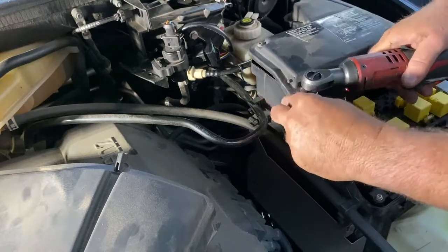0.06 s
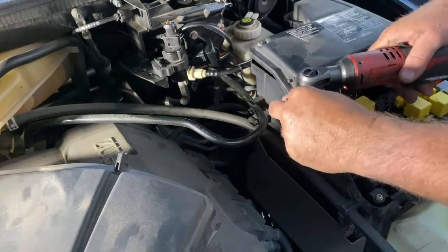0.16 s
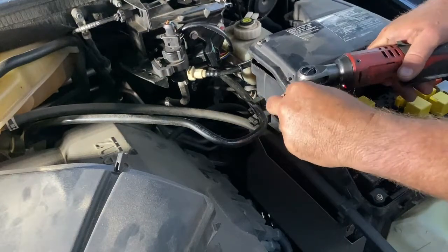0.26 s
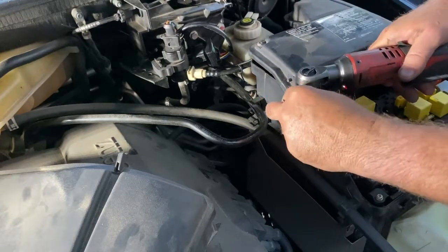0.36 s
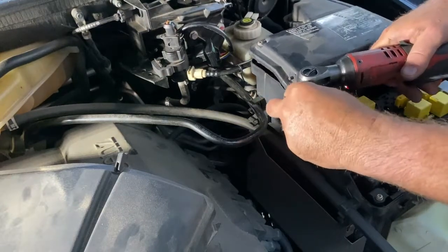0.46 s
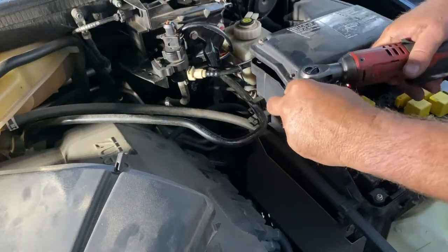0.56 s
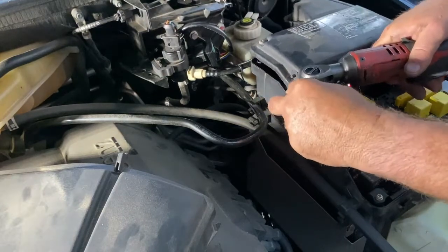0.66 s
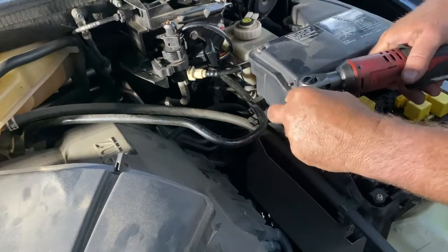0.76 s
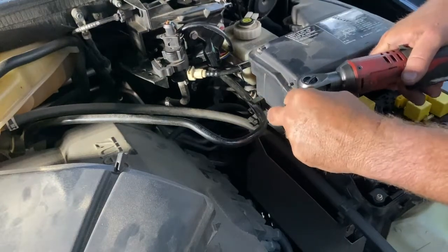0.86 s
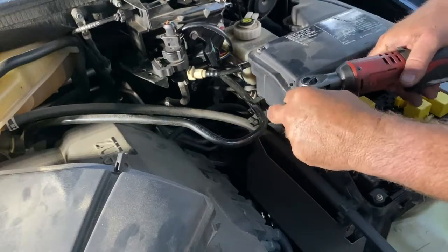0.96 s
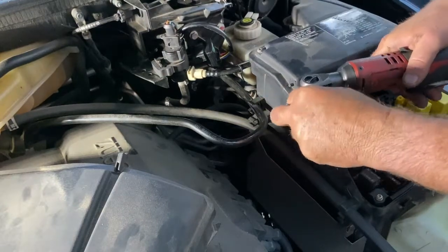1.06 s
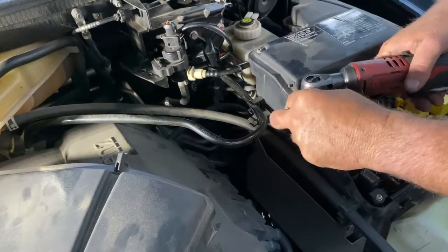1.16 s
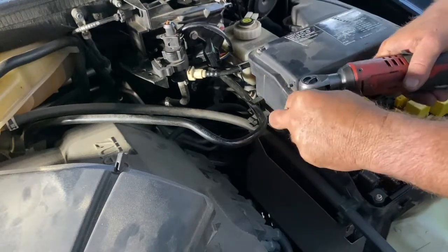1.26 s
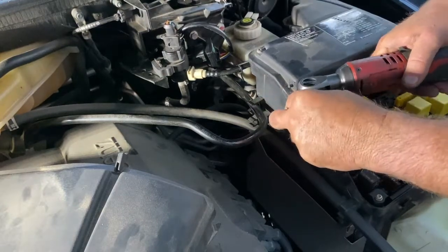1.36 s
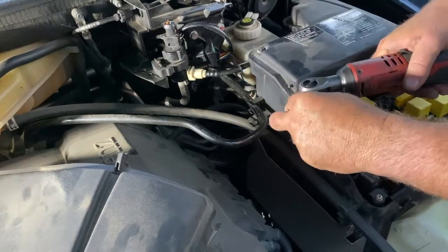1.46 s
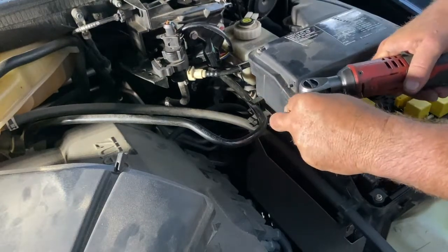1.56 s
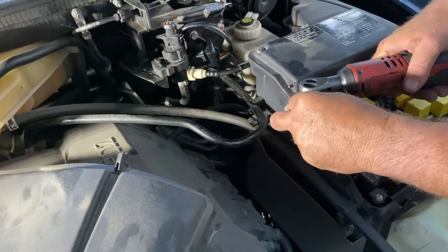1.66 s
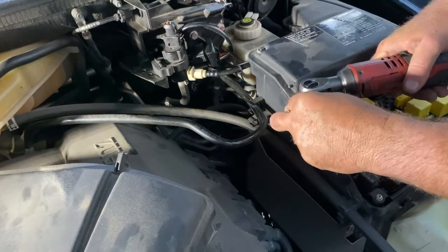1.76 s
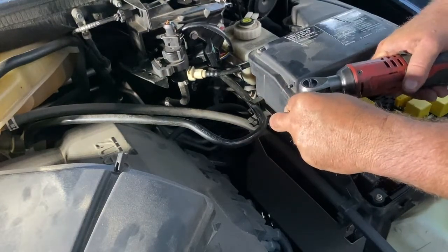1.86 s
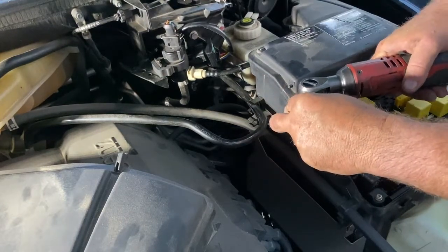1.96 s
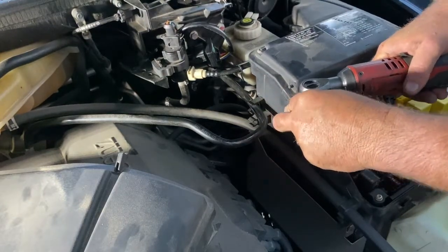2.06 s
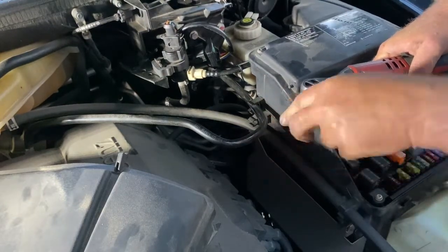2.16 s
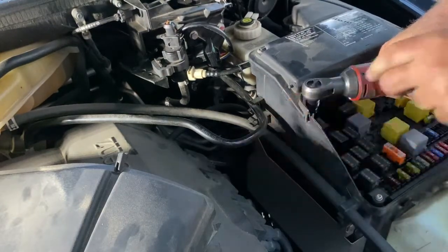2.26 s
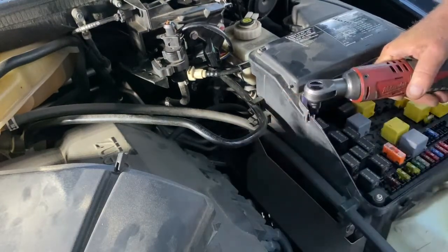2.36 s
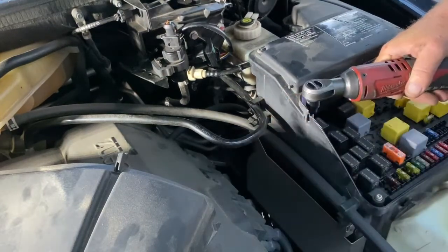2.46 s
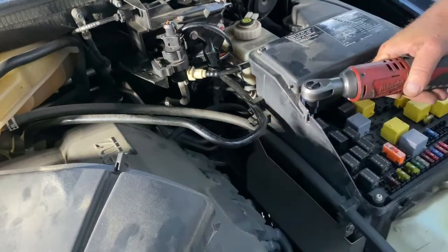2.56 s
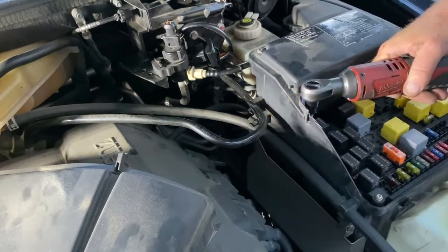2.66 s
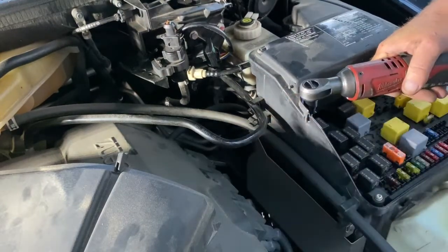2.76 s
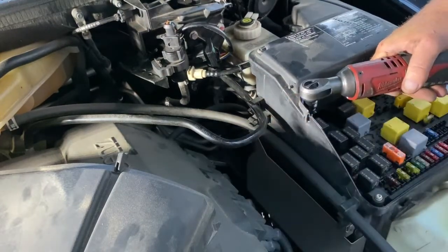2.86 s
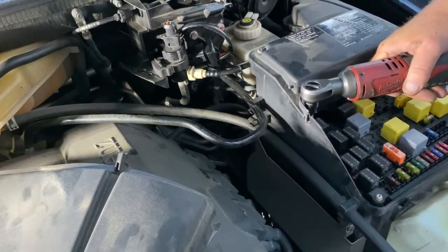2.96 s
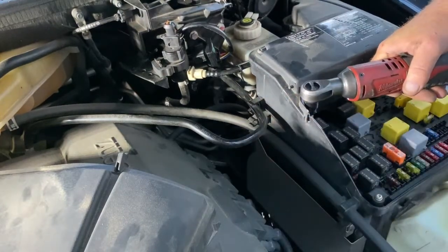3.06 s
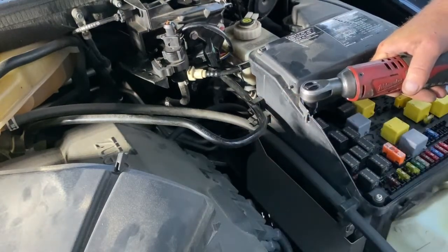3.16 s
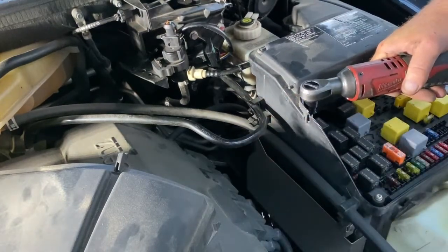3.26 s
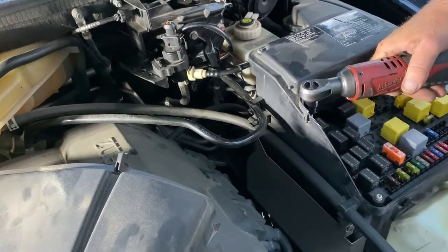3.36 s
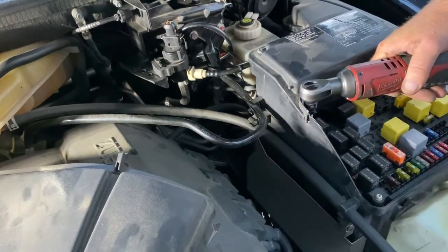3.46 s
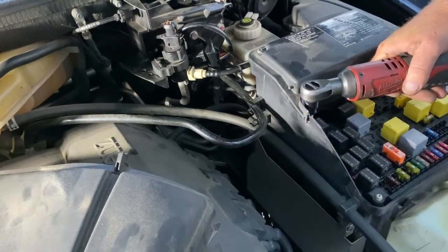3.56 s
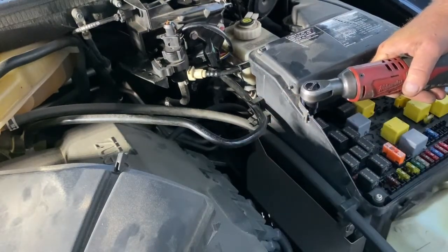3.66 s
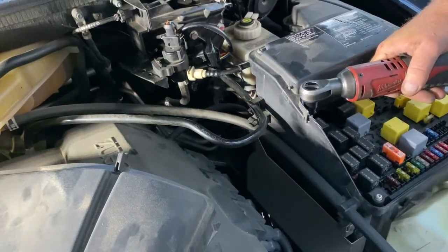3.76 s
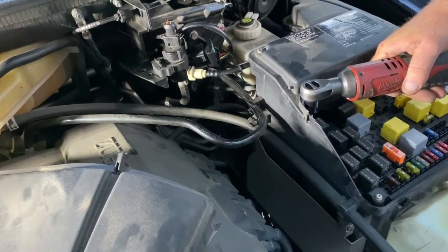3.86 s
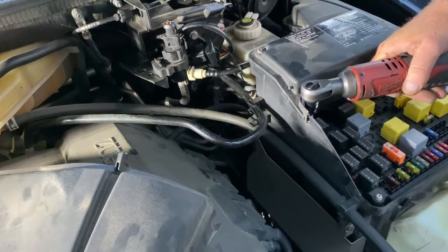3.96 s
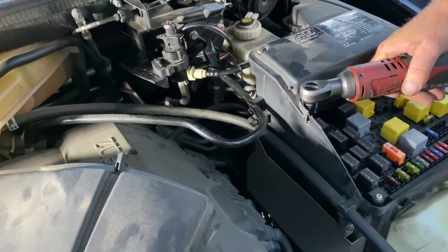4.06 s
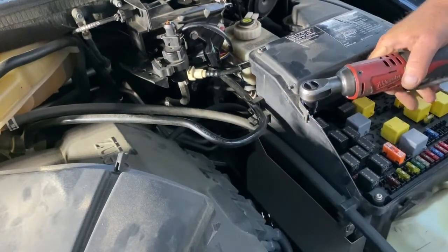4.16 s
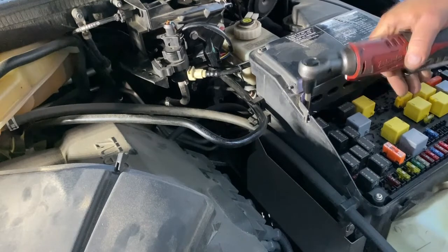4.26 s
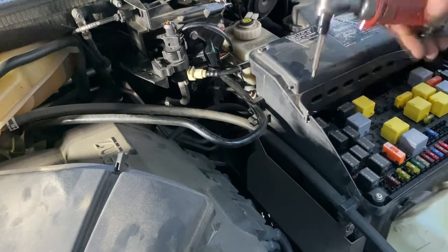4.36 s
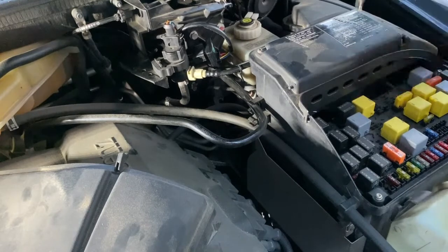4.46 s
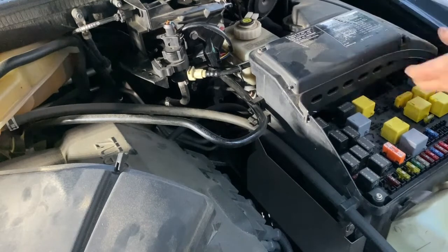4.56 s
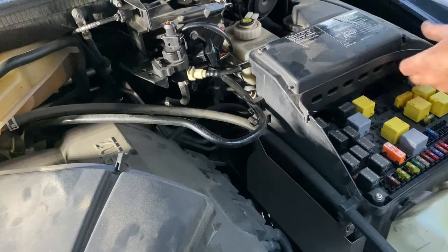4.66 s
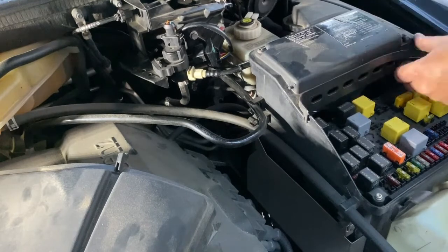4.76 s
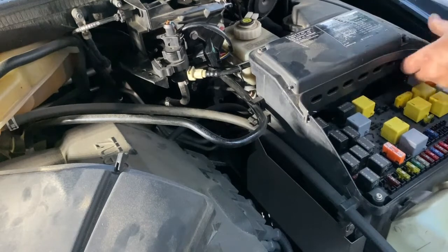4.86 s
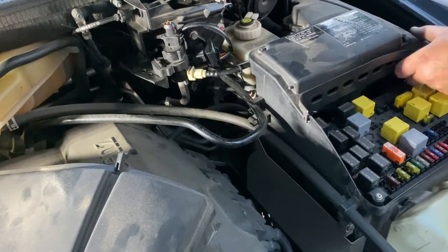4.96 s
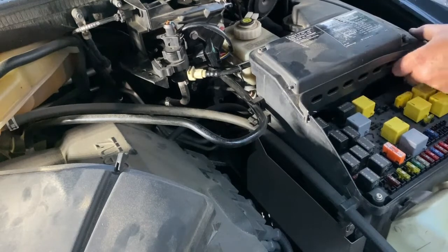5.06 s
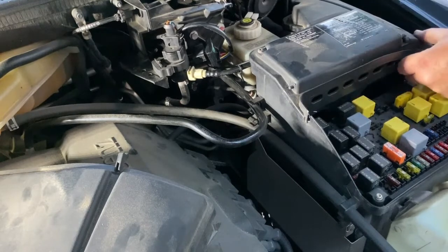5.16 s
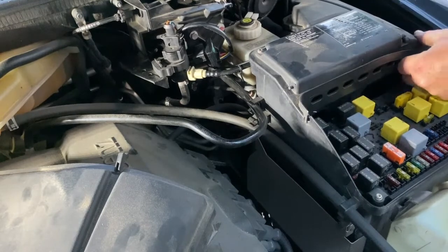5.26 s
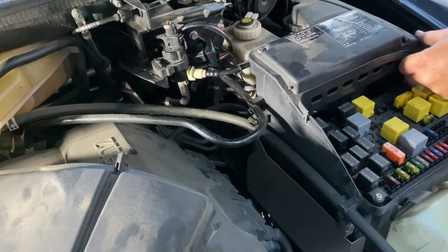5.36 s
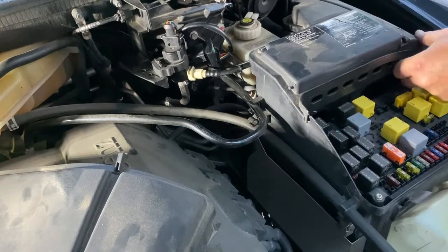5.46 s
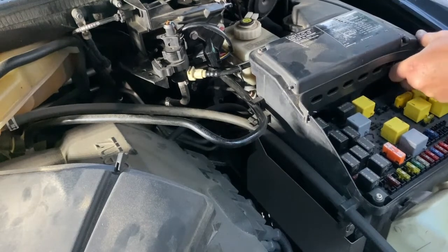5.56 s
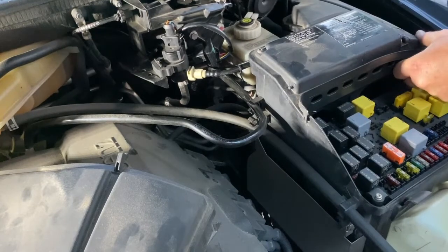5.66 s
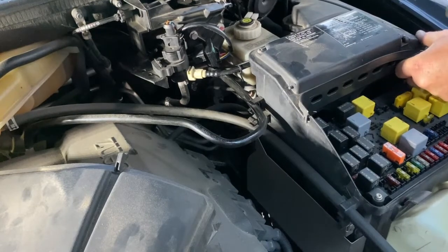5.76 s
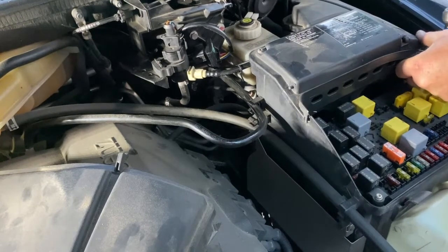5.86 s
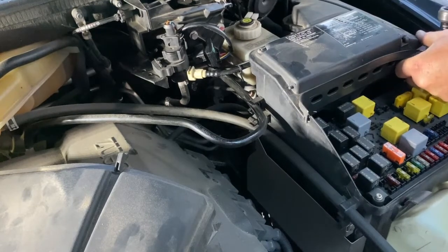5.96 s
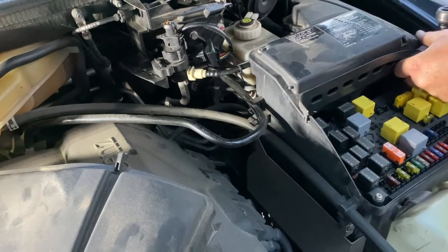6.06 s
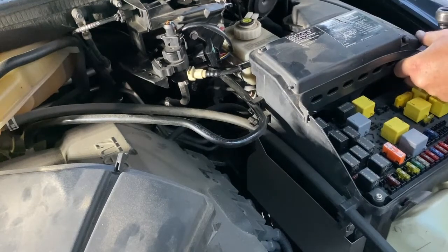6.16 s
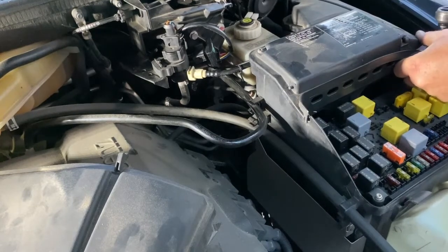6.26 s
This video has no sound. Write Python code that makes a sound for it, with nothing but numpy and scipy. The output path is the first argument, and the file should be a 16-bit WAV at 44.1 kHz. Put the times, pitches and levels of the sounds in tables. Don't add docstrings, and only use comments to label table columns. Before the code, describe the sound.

Hands bump a hollow plastic cover outdoors, then a cordless ratchet rattles harshly for three seconds, clicks down to rest, and the cover snaps home.

```python
import sys
import numpy as np
from scipy import signal
from scipy.fft import rfft, irfft, next_fast_len
from scipy.io import wavfile
from scipy.ndimage import uniform_filter1d

SR = 44100
rng = np.random.default_rng(int(sys.argv[2]) if len(sys.argv) > 2 else 0)


def magnitude_from_level(level_db):
    exponent = np.asarray(level_db, float) / 20
    return 10 ** exponent


def store_wav(level_fs):
    pcm = np.round(np.clip(np.atleast_2d(level_fs), -1, 1) * 32767)
    wavfile.write(sys.argv[1], SR, pcm.T.astype(np.int16))


N = 277389
T = np.arange(N) / SR
HZ = np.fft.rfftfreq(N, 1 / SR)


def evened(x):
    return x / np.sqrt(np.mean(x ** 2) + 1e-20)


def read(points, hz):
    f, value = np.transpose(points)
    return np.interp(np.log(hz + 1), np.log(f + 1), value)


def curve(rows, column, outside):
    rows = np.array(rows)
    return np.interp(T, rows[:, 0], rows[:, column], outside, outside)


def add(mix, s, sound):
    part = mix[round(s * SR):][:len(sound)]
    part += sound[:len(part)]


def coloured(x, points):
    n = x.shape[-1]
    return irfft(rfft(x) * magnitude_from_level(read(points, np.fft.rfftfreq(n, 1 / SR))), n)


def resonate(x, hz, width):
    turn = np.exp(2j * np.pi * np.cumsum(hz * np.ones(x.shape[-1])) / SR)
    r = np.exp(-np.pi * width / SR)
    return 2 * (turn * signal.lfilter([1 - r], [1, -r], x / turn)).imag


def ring(x, modes, drift_db=0):
    out = 0
    for k, (hz, width, db) in enumerate(modes):
        if drift_db:
            db = db + drift_db * wander(8.2)
        out = out + (-1) ** k * magnitude_from_level(db) * resonate(x, hz, width) / np.sqrt(width)
    return out


def wander(hz):
    return evened(irfft(rfft(rng.standard_normal(N)) / (1 + (HZ / hz) ** 2), N))


def levelled(x, db, span=0.24):
    return magnitude_from_level(db) * x / np.sqrt(abs(uniform_filter1d((x ** 2).mean(0), int(span * SR))) + 1e-12)


def chatter(per_s, spread_db, share):
    size = magnitude_from_level(spread_db * np.minimum(rng.exponential(1, (2, N)), 3)) * rng.choice([-1, 1], (2, N))
    sparse = evened(size * (rng.random((2, N)) < per_s / SR))
    return share * sparse + (1 - share) * rng.standard_normal((2, N))


PULL_S, LET_GO_S = 1.362, 4.246
RISE_DB_PER_S, FALL_DB_PER_S = 1405, 1099.5
WAKE_S, SETTLE_DB_PER_S, SETTLE_S = .018, 220, .05
LINGER = 45


def running(lead_s=0):
    rise = RISE_DB_PER_S * (T + min(lead_s, WAKE_S) - PULL_S - .02)
    fall = FALL_DB_PER_S * (LET_GO_S - T) / (1 + LINGER * lead_s)
    settle = SETTLE_DB_PER_S * lead_s * np.exp(-np.maximum(T - PULL_S, 0) / SETTLE_S)
    return (np.minimum(np.minimum(rise, fall), 0) - settle).clip(-120)


# frequency in Hz, level in dB per Hz.
WIND = [(15, -44), (25, -7), (54, 1), (76, -10), (134, -21.5), (151, -26.5), (182, -29.5), (400, -52),
        (520, -80.5), (880, -120)]
# frequency in Hz, level in dB per Hz.
AIR = [(59, -21.5), (100, -9), (365, -21.5), (461, -27), (752, -21), (1310, -25.5), (1610, -23),
       (2170, -25.5), (3860, -41), (5300, -41), (6560, -37), (8830, -64), (11600, -55), (16000, -77)]
# frequency in Hz, left-right likeness.
AIR_SAME = [(40, 0.88), (250, 0.22), (700, 0.13), (3000, 0.23), (15000, 0.28)]
# time in seconds, level in dB.
TRAFFIC = [(0, -48.5), (.3, -53), (.68, -51), (1.0, -50), (1.35, -50.5), (4.4, -54), (4.8, -60),
           (5.5, -64.5), (6.29, -71.5)]
WIND_DB, HISS_DB, HISS_SHARE, HUM_SHARE = -53, -15, 0.93, 1.05
BAY_HUM_DB, BAY_HISS_DB = 6.5, 23.5
GUST_S, GUST_DB, GUST_RISE_S = 5.82, 5, 0.16


def air():
    a, b = rfft(rng.standard_normal((2, N)))
    same = np.clip(read(AIR_SAME, HZ), 0, 1)
    z = np.array([a, same * a + np.sqrt(1 - same ** 2) * b])
    low = 1 / (1 + (HZ / 500) ** 4)
    far_db = curve(TRAFFIC, 1, None) + 50
    wash = uniform_filter1d(magnitude_from_level(running()), int(.08 * SR))
    gust_db = GUST_DB * np.clip(1 - abs(T - GUST_S) / GUST_RISE_S, 0, 1)
    rumble_db = WIND_DB + gust_db + 1.5 * wander(6.2)
    hum_db = -50.0 + HUM_SHARE * far_db + BAY_HUM_DB * wash + 2.9 * wander(5.4)
    hiss_db = -39 + HISS_DB + HISS_SHARE * far_db + BAY_HISS_DB * wash + 0.41 * wander(4)
    traffic = z * magnitude_from_level(read(AIR, HZ))
    rumble = evened(irfft(z * magnitude_from_level(read(WIND, HZ)), N)) * magnitude_from_level(rumble_db)
    hum = evened(irfft(traffic * low, N)) * magnitude_from_level(hum_db)
    hiss = evened(irfft(traffic * (1 - low), N)) * magnitude_from_level(hiss_db)
    return (rumble + hum + hiss) * magnitude_from_level([[.8], [-.8]])


# start in seconds, length in seconds, pitch in Hz, tone level in dB, buzz level in dB.
INSECTS = [
    (-.4, 0.88, 6890, -63.5, -71),
    (.45, 0.74, 6660, -63, -71),
    (1.047, 0.55, 7350, -70, -64.5),
    (4.822, 0.47, 5430, -76, -82),
    (5.355, .11, 5050, -80, -90),
    (5.777, 0.39, 7240, -78, -73.5),
]
SAG_PER_S, SONG_EDGE_DB = 0.027, -12.5
STEADY_SONG = .9


def insects():
    out = np.zeros(N)
    for start, length, top_hz, tone_db, buzz_db in INSECTS:
        along = np.clip((T - start) / length, 0, 1)
        hz = top_hz * (1 - SAG_PER_S * along * length)
        singing = uniform_filter1d(((along > 0) & (along < 1)) * 1., 1500)
        gate = singing * magnitude_from_level(SONG_EDGE_DB * (2 * along - 1) ** 2)
        wavering = evened(resonate(resonate(rng.standard_normal(N), hz, 49), hz, 90))
        steady = np.sin(2 * np.pi * np.cumsum(hz + 25 * wander(40)) / SR)
        tone = wavering + STEADY_SONG * steady
        buzz = evened(resonate(resonate(rng.standard_normal(N), .88 * hz, 1500), .88 * hz, 1500))
        out += gate * (magnitude_from_level(tone_db) * tone + magnitude_from_level(buzz_db) * buzz)
    return out


# frequency in Hz, width in Hz, level in dB.
THUD = [(126, 17, -8), (333, 69, -16), (410, 310, -12.5)]
# frequency in Hz, level in dB per Hz.
SCRAPE = [(900, -22.5), (1500, 3.5), (2800, -5), (5000, -9), (7500, -8.5), (9200, -21), (10500, -15.5),
          (14300, -28), (16000, -42.5)]
TOUCH_S = 0.0042
HEAVY_DB, HEAVY_BASS = -16.5, 0.62
HEAVY_DAMP_HZ = 3


def contacts(rows, scrape_db, walls):
    out, t = np.zeros(N), np.arange(7000) / SR
    touch = t / TOUCH_S * np.exp(1 - t / TOUCH_S)
    for s, thud_db, knock_db, hz in rows:
        push, grit = touch * rng.standard_normal((2, len(t)))
        blow = (t == 0) + 0.064 * push
        heavy_db = max(thud_db - HEAVY_DB, 0)
        thud = ring(blow, [(hz, 35 + HEAVY_DAMP_HZ * heavy_db, 0)] + list(THUD))
        thud = thud - (magnitude_from_level(HEAVY_BASS * heavy_db) - 1) * ring(blow, THUD[:1])
        knock = ring(push, walls)
        scrape = coloured(grit, SCRAPE) * (touch > .01)
        parts = [(thud_db, thud), (knock_db + 7.0, knock), (knock_db + scrape_db + 12.5, scrape)]
        add(out, s - .002, sum(magnitude_from_level(db) * part / abs(part).max() for db, part in parts))
    return out


# time in seconds, thud level in dB, knock level in dB, thud pitch in Hz.
BUMPS = [(0.018, -23.5, -36, 250), (0.058, -29, -37.5, 224), (0.084, -22, -38, 256), (0.093, -19, -40, 222),
         (0.232, -40, -46, 230), (0.262, -30, -54, 201), (0.443, -25, -42.5, 227), (0.527, -27, -38, 251),
         (0.602, -41, -58, 265), (0.794, -31, -44, 245), (0.807, -26, -38, 185), (0.844, -36.5, -63, 204),
         (0.921, -37, -66, 250), (0.962, -33, -45, 265), (0.974, -25.5, -54, 208), (0.999, -36, -67, 207),
         (1.105, -32.5, -63, 240), (1.153, -36, -57, 246), (1.346, -48, -40, 247), (2.469, -18, -27.5, 333),
         (4.823, -53, -53.5, 233), (5.052, -31, -35, 330), (5.059, -12, -41, 283), (5.153, -40, -62, 211),
         (5.201, -45, -46.5, 326), (5.213, -37, -43, 287), (5.235, -39, -52, 254), (5.29, -53, -59, 171),
         (5.503, -51, -57, 253), (5.738, -52, -65, 285)]
# time in seconds, thud level in dB, knock level in dB, thud in Hz.
SLIPS = [
    (0.251, -41, -44, 200),
    (0.43, -27.5, -43, 218),
    (0.762, -33, -38, 225),
    (0.774, -26.5, -37, 249),
    (1.438, -21, -31, 266),
]
# time in seconds, thud level in dB, knock level in dB, thud in Hz.
CLUNKS = [
    (2.474, -22, -36, 396),
    (4.338, -41.5, -33, 234),
    (4.346, -45, -30.5, 235),
    (4.355, -36.5, -35, 234),
    (4.362, -41, -39.5, 172),
]
# frequency in Hz, width in Hz, level in dB.
KNOCK = [(603, 180, -2.5), (756, 140, 7), (1030, 90, 0), (1208, 250, -2.5), (1800, 500, -5),
         (2380, 450, -8)]
# frequency in Hz, width in Hz, level in dB.
SOCKET = [(724, 90, 1.5), (1185, 60, -2), (1680, 80, -11.5), (1884, 120, -8), (2150, 90, -8)]
SKIN_SCRAPE_DB, STEEL_SCRAPE_DB, CLUNK_SCRAPE_DB = -20.5, -8, -16.5


def touches():
    skin = contacts(BUMPS, SKIN_SCRAPE_DB, KNOCK)
    steel = contacts(SLIPS, STEEL_SCRAPE_DB, KNOCK)
    return skin + steel + contacts(CLUNKS, CLUNK_SCRAPE_DB, SOCKET)


# time in seconds, peak level in dB, pitch in Hz.
TICKS = [(0.2488, -56, 6780), (0.4294, -44, 5250), (0.4414, -47, 5090), (0.4534, -48, 6300),
         (0.5287, -39, 5140), (0.763, -32, 7470), (0.7736, -29.5, 5100), (0.8104, -48, 6700),
         (0.9582, -53, 6480), (5.0524, -40, 4660), (5.2759, -58, 4180), (5.5044, -58, 7290)]
# frequency in Hz, level in dB per Hz.
SKIN = [(1500, -24), (3000, -1), (7000, -1.5), (9000, -9.5), (11000, -3), (14500, -7), (16000, -30.5)]
TICK_S, TICK_WIDTH_HZ, TICK_DB, TICK_WIDE_DB = 0.0034, 1500, -1, -5


def ticks():
    out, t = np.zeros(N), np.arange(1200) / SR
    for s, db, hz in TICKS:
        grit = rng.standard_normal(len(t)) * t / TICK_S * np.exp(1 - t / TICK_S)
        tick = evened(resonate(grit, hz, TICK_WIDTH_HZ)) + magnitude_from_level(TICK_WIDE_DB) * evened(coloured(grit, SKIN))
        add(out, max(s - .001, 0), magnitude_from_level(db + TICK_DB) * tick / abs(tick).max())
    return out


def strikes(turns, table, uneven_db, base):
    chance = np.clip(rng.standard_normal((int(turns[-1]) + 3, len(table))), -2, 2)
    out = base
    for k, (angle, db, decay) in enumerate(table):
        since = turns - angle + 1
        out = out + magnitude_from_level(db + uneven_db * chance[since.astype(int), k]) * np.exp(-(since % 1) / decay)
    return uniform_filter1d(out, int(.0018 * SR))


def blows(turns, angle, uneven_db):
    out = np.zeros((2, N))
    at = np.flatnonzero(np.diff(np.floor(turns - angle)))
    out[:, at] = magnitude_from_level(uneven_db * np.clip(rng.standard_normal((len(at), 2)), -2, 2)).T
    return out


def patchy(x, depth_db, broad_db=1.0):
    z = signal.stft(x, nperseg=256)[2]
    patches = uniform_filter1d(rng.standard_normal(z.shape[1:]), size=5, axis=0)
    patches = uniform_filter1d(patches, size=5, axis=1)
    broad = uniform_filter1d(uniform_filter1d(patches, size=25, axis=1), size=25, axis=1)
    gain_db = depth_db * evened(patches) + broad_db * evened(broad)
    return signal.istft(z * magnitude_from_level(gain_db), nperseg=256)[1][:, :N]


# time in seconds, speed in turns per second.
SPEED = [(1.34, 42.3), (1.39, 47.1), (1.46, 64.9), (1.5, 69), (1.58, 71.3), (4.11, 70.4), (4.15, 69.5),
         (4.19, 65.3), (4.22, 57), (4.3, 48)]
# time in seconds, pressure in dB, seating of the cover (0 loose, .5 resting, 1 tight).
GRIP = [(1.36, 2.5, 0.3), (1.55, 1, 0.034), (1.8, 1, 0), (2.03, -1.5, 0.063), (2.2, 1.17, 0.44),
        (2.6, 1.23, 0.58), (2.95, -0.54, 0.6), (3.2, 0.5, 0.87), (3.45, 1.4, 0.8), (3.62, -1, 0.81),
        (3.85, 2.5, 1.05), (4.26, -1.3, 0.81)]
FULL_SPEED = 71


def answer(part):
    db, rest_db, tight_db, still_db, share, lead_s = part
    slow = np.maximum(1 - curve(SPEED, 1, 45) / FULL_SPEED, 0)
    seat = 2 * curve(GRIP, 2, None)
    seated_db = rest_db * np.clip(seat, 0, 1) + tight_db * np.maximum(seat - 1, 0)
    return running(lead_s) + db + seated_db + still_db * slow + share * curve(GRIP, 1, None)


# time in seconds, shaft rate in Hz.
MOTOR = [(1.38, 233.6), (1.46, 286.8), (1.53, 306.4), (1.75, 311.5), (2.45, 315.8), (3.52, 306.7),
         (4.11, 302), (4.26, 237)]
# frequency in Hz, width in Hz, level in dB.
HOUSING = [(284.2, 12.7, 1), (365, 90, -11.5), (412.4, 51, -8.5), (530, 81, -17)]
# frequency in Hz, width in Hz, level in dB.
COVER = [(638.7, 44, -4), (716, 44, 0), (796.5, 19, -1), (926, 22, -3), (1072, 45, -11)]
# frequency in Hz, width in Hz, level in dB.
LOOSE_COVER = [(790, 70, 3), (940, 70, 3), (1065, 60, -4)]
# frequency in Hz, width in Hz, level in dB.
STEEL = [(1129, 46, -2.5), (1395, 73, 6.5), (1816, 160, 0), (2138, 50, 2), (2660, 48, 4.5),
         (3010, 100, 2.5), (3690, 250, 3), (4330, 120, -2), (4990, 140, -0.5), (6830, 760, 5)]
# frequency in Hz, level in dB per Hz.
RATTLE = [(240, -41.5), (400, -10.5), (494, -12.5), (550, -18), (707, -9.5), (922, -7), (1110, -7.5),
          (1200, -13), (1390, -10.5), (1630, -11), (3080, -10.5), (5900, -14), (6730, -13.5), (9500, -14.5),
          (12400, -45), (20900, -120)]
# frequency in Hz, level in dB per Hz.
PAWL = [(7500, -21.5), (8600, -11), (9300, -8), (10700, -4), (12200, -0.5), (13400, 7), (14800, -12),
        (15700, 1), (16100, -33.5), (17000, -50.5)]
# part of a turn, strength in dB, die-away as part of a turn.
GEAR_STRIKES = [(.0, 1, 0.68), (.3, -8.5, 0.16), (.62, -1.5, .2)]
# part of a turn, strength in dB, die-away as part of a turn.
PAWL_STRIKES = [(.0, -7.5, 0.29), (0.299, -8.5, 0.13), (0.601, -2.5, .1)]
# times a turn, level in dB.
SWAY = [(1, -50), (6, -44.5)]
# times a turn, level in dB.
SEATED_SWAY = [(5, -45), (7, -51)]
# loose cover dB, gain once it rests dB, further gain pressed tight dB,
# gain at standstill dB, share of the pressure, lead s.
BOOM, BUZZ = (-35.5, 8.5, -2.5, 8, 0.64, 0.02), (-30, -3.5, 7.5, -10, -0.27, 0)
FLAP, DRONE = (-25.5, -13, -4.5, 12, -0.65, 0.07), (-46.5, -2, -0.5, 9, 0.6, 0)
GEAR, HISS = (-24, -0.24, -1.5, -21.5, 1.32, 0), (-23.5, -2.5, -2.5, -12, 0.74, 0)
HUM = (-28, -9, 0, -44.5, 1.3, 0)
SLOW_KNOCK = 4.2045
DRONE_FROM_S, DRONE_GAIN_DB = 2.62, 9.5
LOOSE_SHAKE, TIGHT_SHAKE = 2.5, -.55
LOOSE_LOW_DB = -7
LOOSE_SHARE = .6
LOOSE_THROB, THROB_ANGLE, PAWL_LAG = 0.38, 0.94, .41


def ratchet():
    speed = curve(SPEED, 1, 45)
    turns = np.cumsum(speed * (1 + .003 * wander(30))) / SR
    turns += (.2 - turns[round(SLOW_KNOCK * SR)]) % 1
    knocks = blows(turns, .2, 1.2) + .6 * (speed / FULL_SPEED) ** 24 * blows(turns, .62, 1.6)
    knocks = knocks * (T < LET_GO_S + .006)
    clacks = blows(turns, 0.012, 2.0) + .4 * blows(turns, .13, 3.5)
    shake = rng.standard_normal((2, N))
    seat = 2 * curve(GRIP, 2, None) - 1
    loose, tight = np.clip(-seat, 0, 1), np.clip(seat, 0, 1)

    boom = levelled(ring(knocks + 0.0091 * shake, HOUSING, 2.0), answer(BOOM))
    tremble = 1 + LOOSE_SHAKE * loose + TIGHT_SHAKE * tight
    struck = knocks + .007 * tremble * (speed / FULL_SPEED) ** 12 * shake
    cover = (1 - LOOSE_SHARE * loose) * ring(struck, COVER, 1.7) + loose * ring(struck, LOOSE_COVER)
    buzz = levelled(cover, answer(BUZZ))
    flutter = shake * magnitude_from_level(4.2 * wander(40))
    flap = levelled(resonate(resonate(flutter, 238.6, 52), 310, 87), answer(FLAP))
    drone_db = answer(DRONE) + DRONE_GAIN_DB * np.clip((T - DRONE_FROM_S) / 0.043, 0, 1)
    drone = levelled(resonate(resonate(knocks + 0.016 * shake, 141, 23), 141, 60), drone_db)

    clatter = magnitude_from_level(LOOSE_LOW_DB * loose) * ring(clacks, STEEL[:3], 2.7) - ring(clacks, STEEL[3:], 2.2)
    head = levelled(clatter, answer(GEAR) - 3.5)
    gear_grit = chatter(3000, 3.3, 0.44) * strikes(turns, GEAR_STRIKES, 2.3, 0.94)
    gear = patchy(coloured(gear_grit, RATTLE), 1.78)
    pawl_grit = chatter(5000, 3.0, 0.18) * strikes(turns - PAWL_LAG + 1, PAWL_STRIKES, 3.1, 0.11)
    pawl = patchy(coloured(pawl_grit, PAWL), 0.91)
    pawl = pawl * (1 + LOOSE_THROB * loose * np.cos(2 * np.pi * (turns - THROB_ANGLE)))
    steel = head + levelled(gear, answer(GEAR) - .8) + levelled(pawl, answer(HISS))

    sway = np.zeros(N)
    for k, db in SWAY:
        sway += magnitude_from_level(running() + db + 2.6 * wander(4.4)) * np.sin(2 * np.pi * k * turns)
    for k, db in SEATED_SWAY:
        sway += magnitude_from_level(running() + db) * np.clip(2 * seat + 1, 0, 1) * np.cos(2 * np.pi * k * turns)
    shaft = np.sin(2 * np.pi * np.cumsum(curve(MOTOR, 1, None)) / SR)
    hum = magnitude_from_level(answer(HUM) + 2.0 + 3.2 * wander(8)) * shaft
    return boom + buzz + flap + drone + steel + hum + sway


# time in seconds, length in seconds, peak level in dB,
# pitch in Hz.
HUM_SURGES = [
    (1.348, .034, -25, 255),
    (1.39, .048, -22, 240),
    (1.436, .04, -19.5, 268),
    (4.194, .036, -20.5, 322),
    (4.23, .045, -29, 290),
]


def hum_surges():
    out = np.zeros(N)
    for s, length, db, hz in HUM_SURGES:
        t = np.arange(0, length, 1 / SR)
        swell = np.sin(np.pi * (t / length) ** .7) ** .6
        add(out, s, magnitude_from_level(db) * swell * np.sin(2 * np.pi * hz * t))
    return out


# time in seconds, thud level in dB, knock level in dB, thud pitch in Hz.
JERKS = [
    (1.387, -34, -30, 250),
    (1.409, -34, -24, 240),
    (4.146, -30, -40, 300),
    (4.18, -23, -40, 290),
    (4.272, -32, -55, 330),
    (4.3, -36, -60, 320),
]


def jerks():
    return contacts(JERKS, SKIN_SCRAPE_DB, KNOCK)


# time in seconds, peak level in dB, loudest ring in Hz.
HARD_CLACKS = [(1.3874, -19, 3460), (1.4412, -20, 2150), (1.544, -10, 2400), (1.6006, -16, 1130),
               (1.8523, -9, 3030), (2.0657, -15.5, 1280), (2.1204, -14, 1330), (2.1505, -15, 1320),
               (2.1642, -12, 1360), (2.219, -9.5, 2680), (2.2748, -12, 3623), (2.289, -14.5, 1270),
               (2.3592, -12, 3000), (2.416, -14, 1430), (2.4699, -12, 3016), (2.5424, -13.5, 1420),
               (2.628, -13, 1350), (2.7282, -14.5, 1390), (2.7406, -13.5, 1420), (2.7674, -12.5, 3070),
               (2.854, -14, 1830), (2.908, -14.5, 1410), (2.9503, -15.5, 1860), (2.9935, -13, 2980),
               (3.077, -10.5, 3040), (3.1053, -15, 1277), (3.1903, -9.5, 1840), (3.2325, -10.5, 1840),
               (3.2895, -19, 2120), (3.3888, -7.5, 3700), (3.419, -9.5, 1354), (3.4452, -10.5, 1340),
               (3.5584, -16.5, 1772), (3.6434, -12, 2990), (3.6728, -12.5, 3050), (3.757, -7.5, 3610),
               (3.7844, -12.5, 1428), (3.8427, -13, 2110), (3.9433, -15.5, 1330), (4.0983, -19, 2670),
               (4.2209, -21.5, 1830), (4.2394, -20.5, 1650)]
HARD_DB, HARD_SPREAD = -3.5, .3
HARD_DAMP = 1.8
REBOUND_DB = -5


def hard_clacks():
    out = np.zeros(N)
    blow = (np.arange(2500) == 0) * 1.
    rings = np.array([(-1) ** k * magnitude_from_level(db) * resonate(blow, hz, HARD_DAMP * width) / np.sqrt(width)
                      for k, (hz, width, db) in enumerate(STEEL)])
    for s, db, hz in HARD_CLACKS:
        octaves = np.log2(np.array(STEEL)[:, 0] / hz)
        clack = np.exp(-(octaves / HARD_SPREAD) ** 2) @ rings
        for turn in range(3 if s < LET_GO_S - .1 else 1):
            level = magnitude_from_level(db + HARD_DB + turn * REBOUND_DB)
            add(out, s + turn / FULL_SPEED, level * clack / abs(clack).max())
    return out


# time in seconds, peak level in dB.
SINGLE_KNOCKS = [(1.612, -17), (1.626, -17), (1.71, -17), (1.742, -19), (1.985, -19), (1.999, -19),
                 (4.148, -22), (4.172, -13.5), (4.191, -18), (4.206, -14.5), (4.2225, -15), (4.241, -14.5)]
# frequency in Hz, width in Hz, level in dB.
SINGLE_RING = [(700, 60, 0), (800, 90, -2), (950, 90, -5)]


def single_knocks():
    knock, out = ring((np.arange(3000) == 0) * 1., SINGLE_RING), np.zeros(N)
    for s, db in SINGLE_KNOCKS:
        add(out, s, magnitude_from_level(db) * knock / abs(knock).max())
    return out


# time in seconds, peak level in dB, second click in dB.
COAST = [(4.265, -20.5, -12), (4.286, -19.5, -13.5), (4.306, -22.5, -11.5), (4.328, -20, -10),
         (4.355, -17.5, -9), (4.378, -18, -7), (4.403, -21, -5), (4.4315, -25, -1.5), (4.4635, -20.5, -6),
         (4.4966, -24, -1.5), (4.534, -23, -3), (4.575, -22, -6), (4.622, -27.5, -9), (4.681, -27.5, -1),
         (4.754, -23.5, -9), (4.891, -27.8, -26)]
# time in seconds, peak level in dB, 2-8 kHz part in dB.
STRAYS = [
    (4.647, -39, 3.5),
    (4.7351, -42.5, -24),
    (4.8165, -56, 8),
    (4.847, -56, -5),
    (4.6185, -40, -10),
    (4.829, -51.5, 0),
]
CLICK_S, SECOND_S, DULL_DB, SECOND_DULL_DB = 0.0044, 0.0036, -15.5, -9
CLICK_RISE_S, CLICK_GRAIN = 0.002, .55
CRACK_DB, CRACK_S, CRACK_LATE_S = 1, .0007, .0015
SECOND_CLICK, SECOND_WAIT_S = .15, .005


def coasting():
    high, low = np.zeros((2, N))
    t = np.arange(1500) / SR
    between = np.gradient([row[0] for row in COAST])
    clicks = [(s, db, DULL_DB, CLICK_S) for s, db, _ in COAST]
    clicks += [(s, db, low_db, SECOND_S) for s, db, low_db in STRAYS]
    for (s, db, next_db), gap in zip(COAST, between):
        clicks.append((s + SECOND_WAIT_S + SECOND_CLICK * gap, db + next_db, SECOND_DULL_DB, SECOND_S))
    for s, db, low_db, length in clicks:
        burst = np.exp(-t / max(length, .001)) * np.minimum(t / CLICK_RISE_S, 1) ** 2
        crack = magnitude_from_level(CRACK_DB) * np.exp(-t / CRACK_S)
        add(high, s + CRACK_LATE_S, magnitude_from_level(db + 6.0) * (burst + crack))
        add(low, s + CRACK_LATE_S, magnitude_from_level(db + low_db + 1.5) * (burst + .4 * crack))
    whirr = (T > LET_GO_S) * magnitude_from_level(-36.5 - 60 * np.maximum(T - LET_GO_S, 0) / .9)
    # (Hz, dB per Hz)
    thin = [(700, -52.5), (1200, -6.0), (2500, 2.5), (5000, 4.0), (7500, 2.5), (9000, -12), (10500, -41.5)]
    noise, grit = rng.standard_normal((2, N)), chatter(2500, 4.0, np.clip(CLICK_GRAIN, 0, 1))
    return coloured(high * grit + 1.9 * whirr * noise, PAWL) + coloured(low * grit + whirr * noise, thin)


# time in seconds, level in dB, swell in seconds, fade in seconds.
RUSTLE = [
    (5.0, -72, .04, 0.03),
    (5.208, -62.5, 0.11, 0.056),
    (5.32, -72, .04, .04),
    (5.514, -67.5, 0.045, 0.07),
]
# frequency in Hz, level in dB per Hz.
RUB = [(90, -12), (200, -1), (500, -6.5), (1000, -11.5), (2000, -22), (3000, -50)]
RUB_DB = 11.5


def rustle():
    slides = [top_db - 20 * np.maximum((s - T) / swell, (T - s) / fade) for s, top_db, swell, fade in RUSTLE]
    db = np.max(slides, axis=0).clip(-120)
    grain = chatter(1500, 4.0, .3)
    return levelled(coloured(grain, SKIN), db + 3.0) + levelled(coloured(grain, RUB), db + RUB_DB)


# frequency in Hz, level in dB, 60 dB decay in seconds.
SNAP = [(190, -34, .16), (420, -38, .1), (565, -34, .12), (646, -29, .095), (807, -28, .076),
        (910, -36, .12), (1200, -34, .08), (1470, -27, .045), (1846, -31, .045), (2400, -34, .03),
        (3000, -36, .025), (3700, -44, .02)]
SNAP_S, SNAP_RISE_S = 5.0535, .002


def snap():
    t, out = np.arange(9000) / SR, np.zeros(N)
    modes = sum(magnitude_from_level(db - 60 * t / t60) * np.sin(2 * np.pi * hz * t) for hz, db, t60 in SNAP)
    add(out, SNAP_S, np.minimum(t / SNAP_RISE_S, 1) * modes)
    return out


def echoed(x, t60):
    t = np.arange(3000) / SR
    echoes = rng.standard_normal(len(t)) * magnitude_from_level(-60 * t / t60)
    return np.array([x, signal.oaconvolve(x, echoes / np.linalg.norm(echoes))[:N]])


# frequency in Hz, left-right likeness.
TOOL_SAME = [(100, .9), (280, .95), (500, .65), (720, .75), (1300, .52), (2500, .55), (4500, .3),
             (8000, .62), (13000, .85)]
# frequency in Hz, left lead in radians.
TOOL_LEAD = [(0, 0), (130, -.3), (280, -1), (450, -.4), (700, -.6), (1300, -.9), (2670, 0), (4200, .6),
             (5200, -1.2), (6460, .6), (7300, -.5), (11200, -6.3), (15070, -12.6), (17000, -15)]
# frequency in Hz, left minus right in dB.
TOOL_LEFT = [(100, 1.5), (380, 2), (700, -0.4), (1400, 2), (5000, 1.5), (10000, -0.15)]


def microphones(faces):
    size = next_fast_len(N + 8192)
    hz = np.fft.rfftfreq(size, 1 / SR)
    same = np.clip(read(TOOL_SAME, hz), 0, 1)
    lead = np.interp(hz, *np.transpose(TOOL_LEAD))
    side = np.array([[.5], [-.5]])
    front, flank = rfft(faces, size)
    mixed = np.sqrt((1 + same) / 2) * front + 2j * side * np.sqrt((1 - same) / 2) * flank
    return irfft(mixed * np.exp(1j * side * lead) * magnitude_from_level(side * read(TOOL_LEFT, hz)), size)[:, :N]


def scene():
    far = air()
    near = echoed(insects(), 0.077) + echoed(touches() + ticks(), 0.035)
    near = near + ratchet() + echoed(hard_clacks(), 0.051) + coasting() + rustle()
    near = near + echoed(hum_surges() + jerks() + single_knocks() + snap(), .03)
    return microphones(near) + far


def low_pass(x):
    return signal.sosfilt(signal.butter(12, 16980, fs=SR, output="sos"), x)


# frequency in Hz, level in dB.
TOP = [(15700, 0), (16150, -16)]


def record(dry):
    cut = signal.sosfilt(signal.butter(3, 40, "high", fs=SR, output="sos"), dry)
    return low_pass(coloured(cut, TOP))


dry = scene()
out = record(dry)
store_wav(out)
```